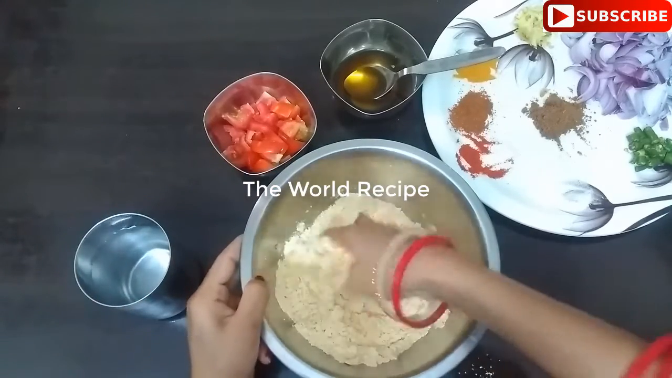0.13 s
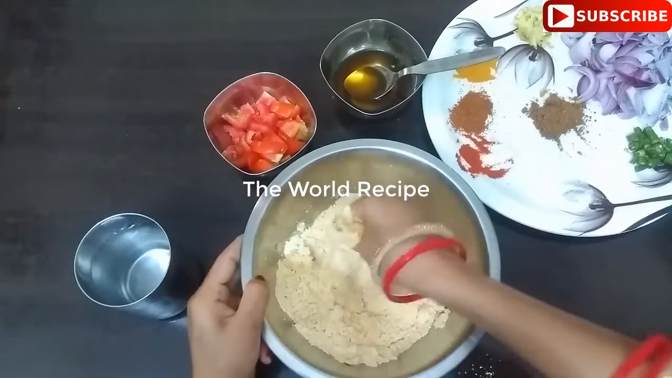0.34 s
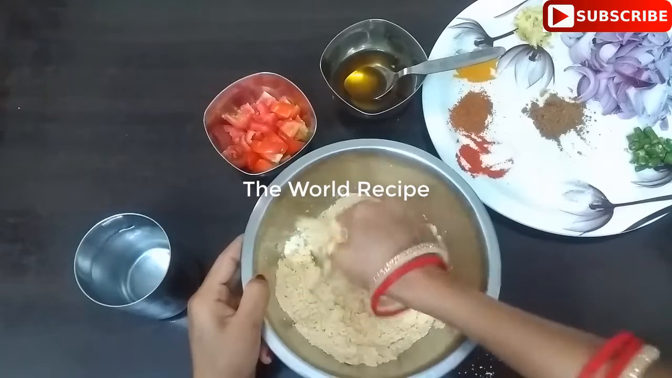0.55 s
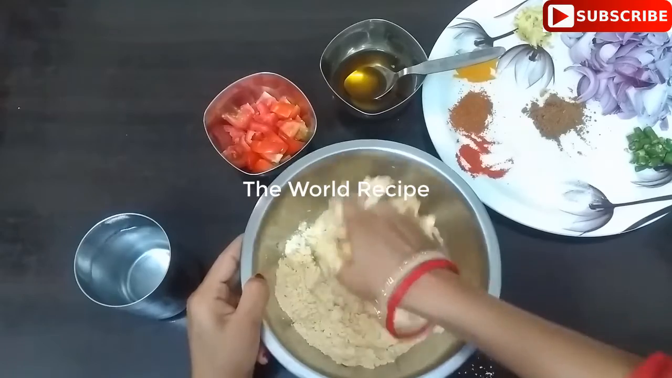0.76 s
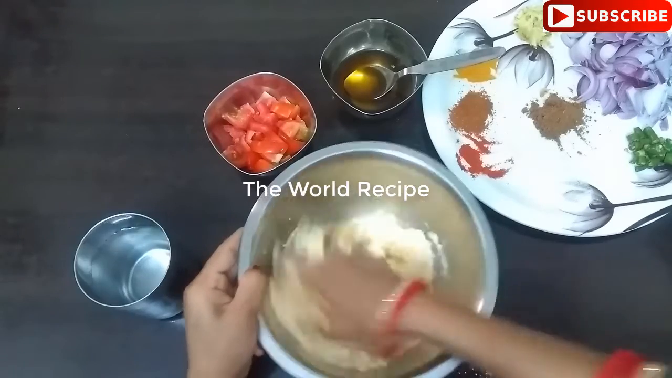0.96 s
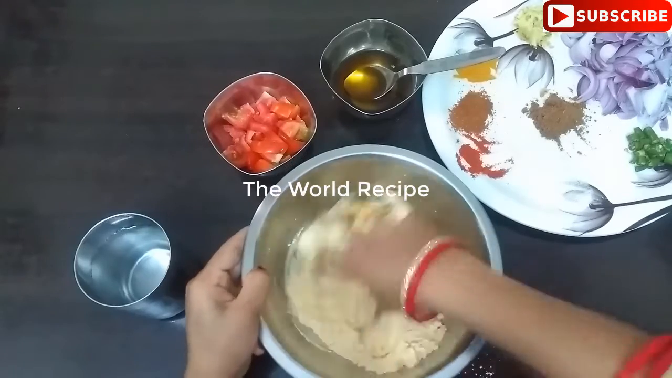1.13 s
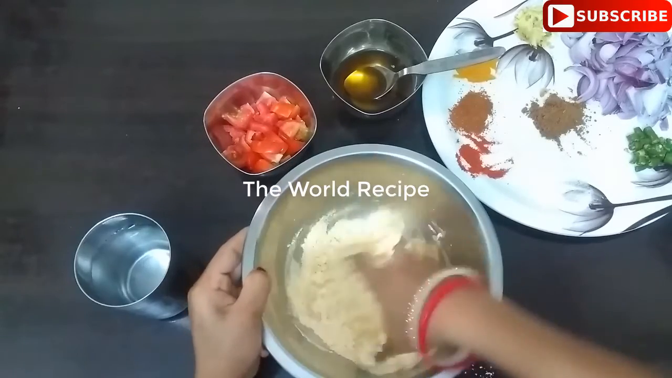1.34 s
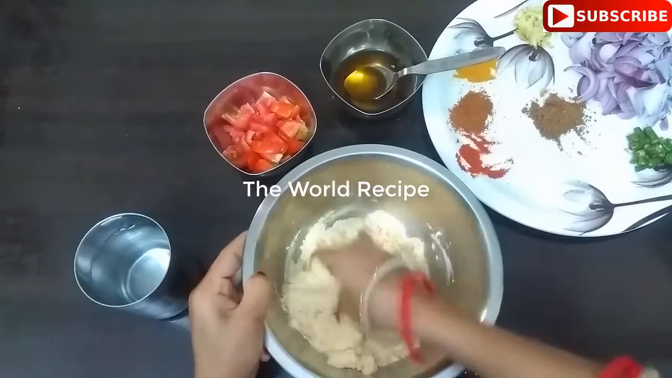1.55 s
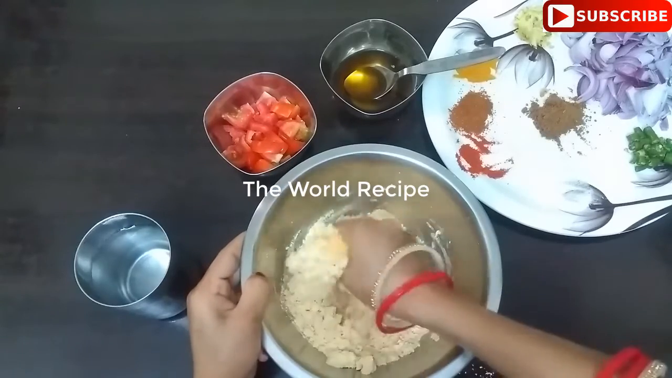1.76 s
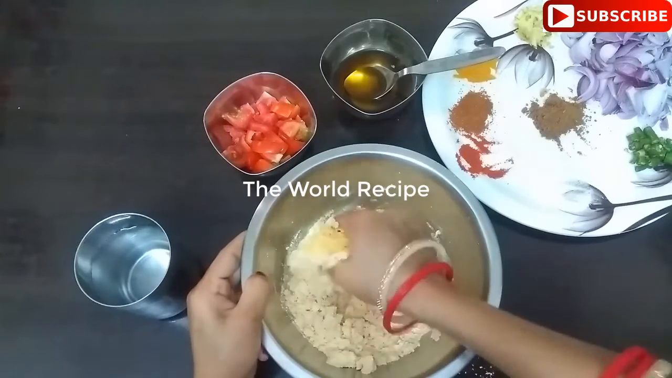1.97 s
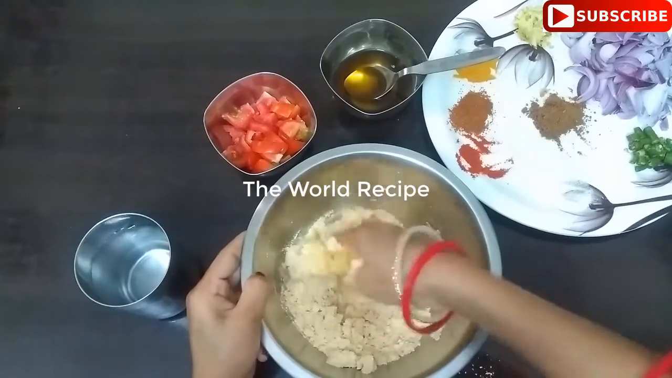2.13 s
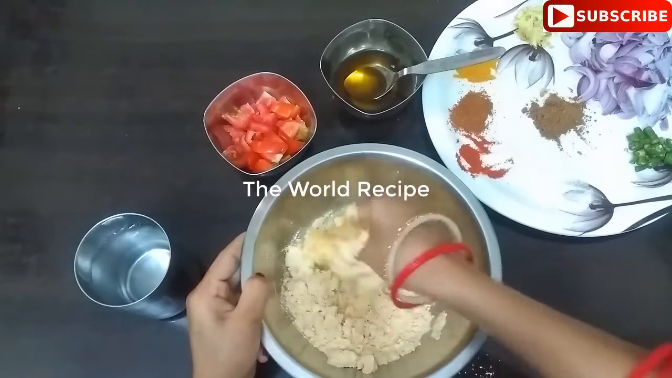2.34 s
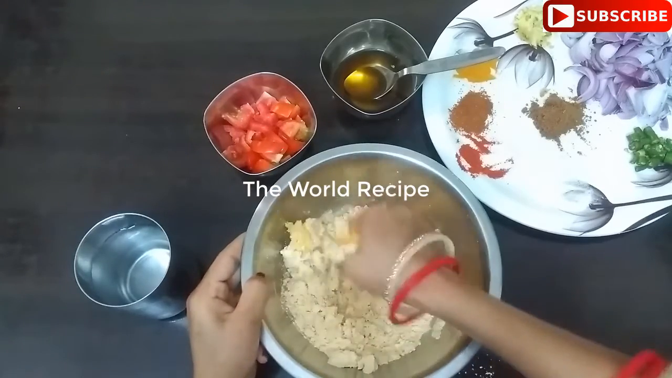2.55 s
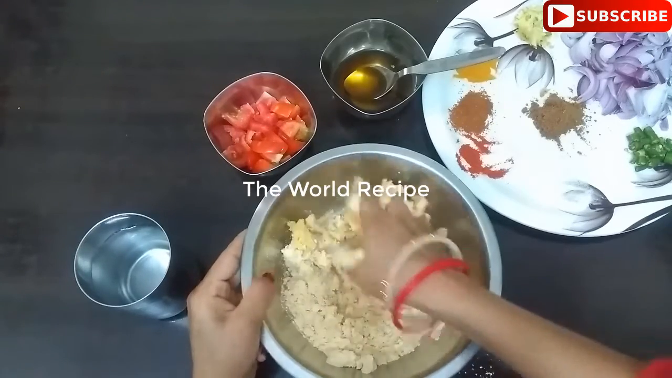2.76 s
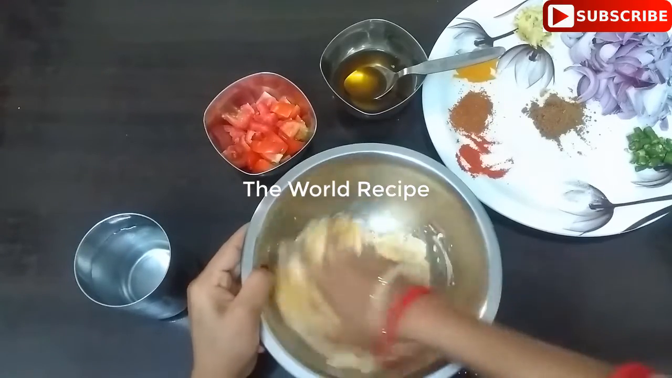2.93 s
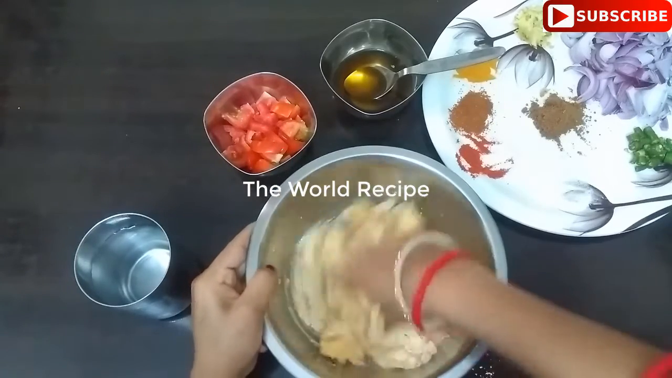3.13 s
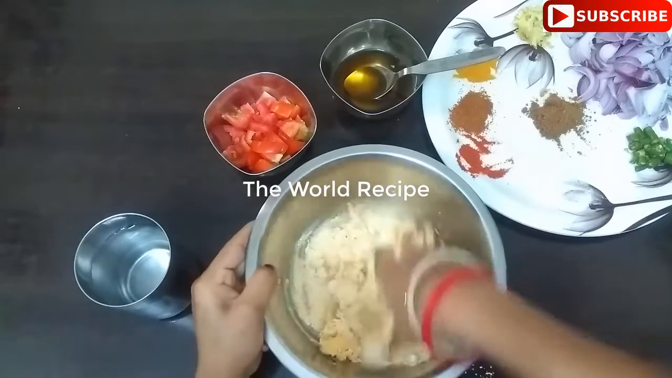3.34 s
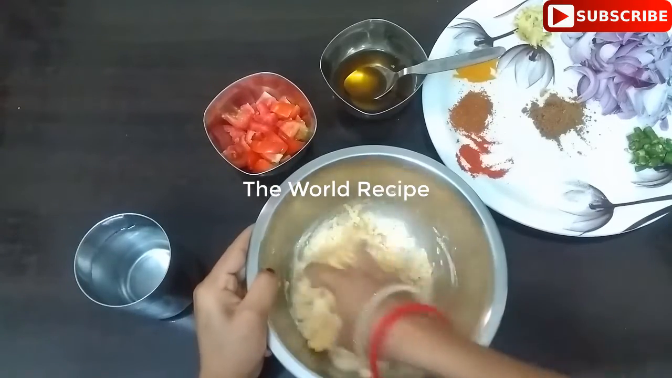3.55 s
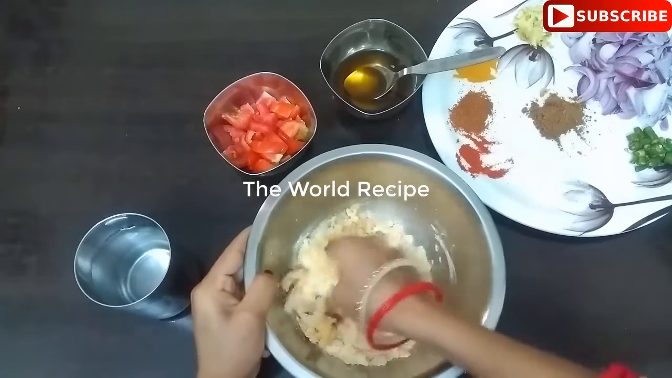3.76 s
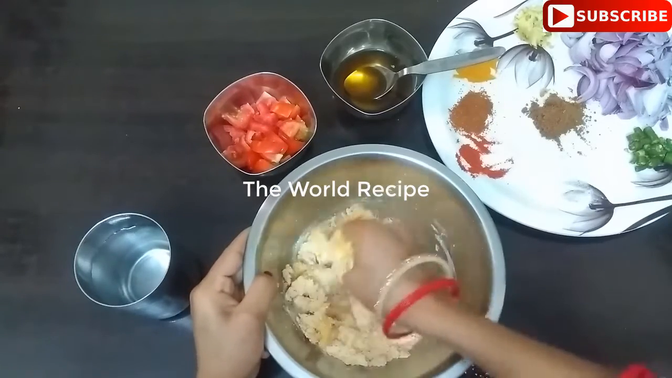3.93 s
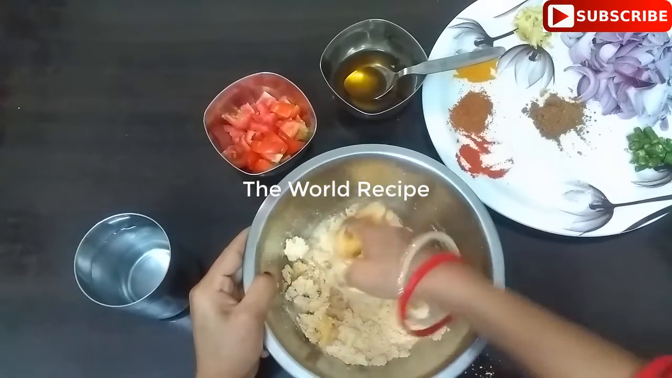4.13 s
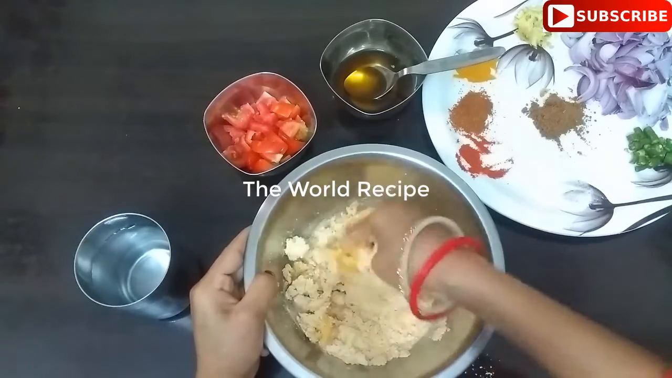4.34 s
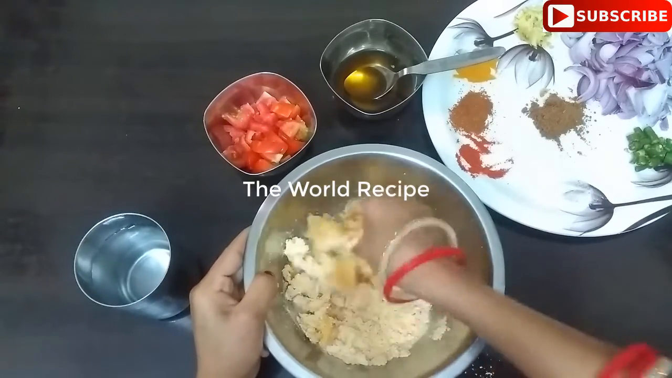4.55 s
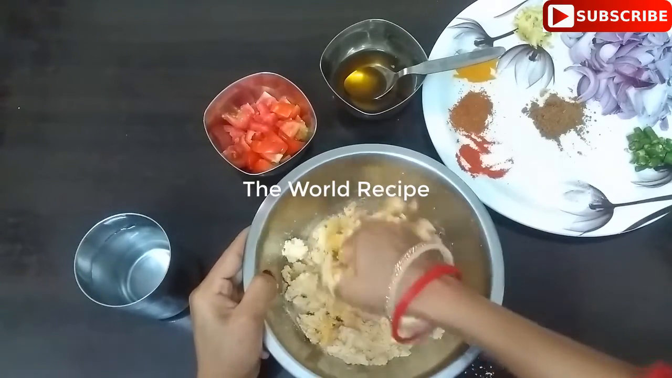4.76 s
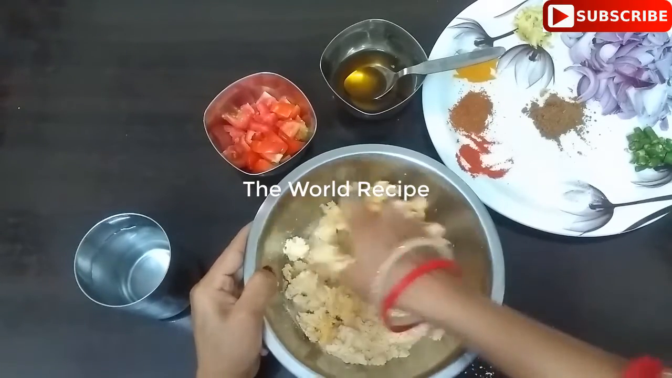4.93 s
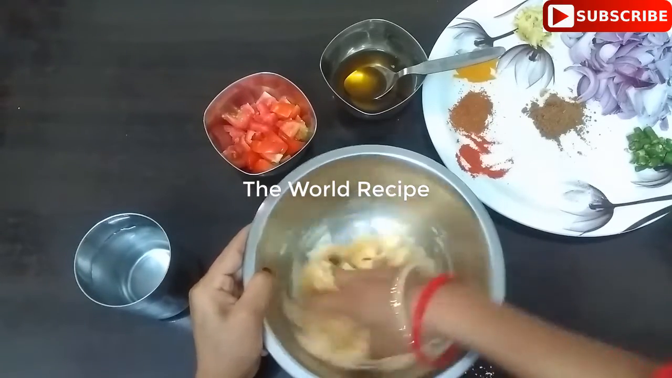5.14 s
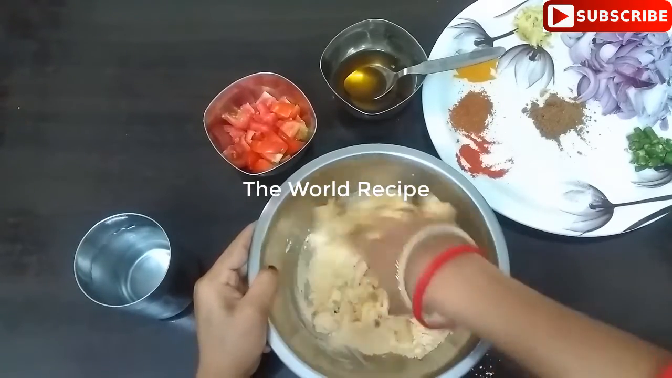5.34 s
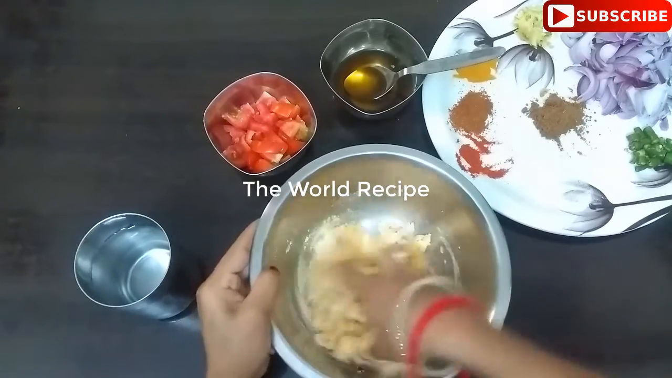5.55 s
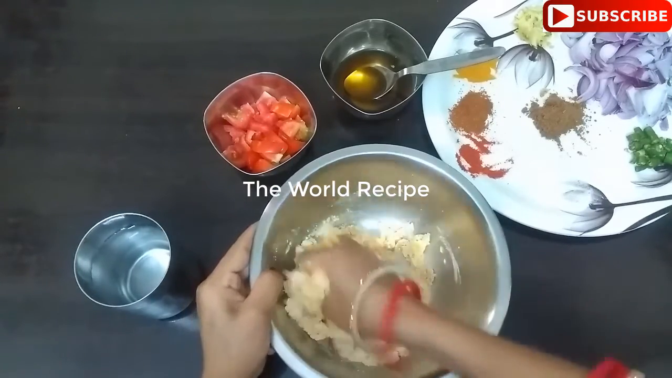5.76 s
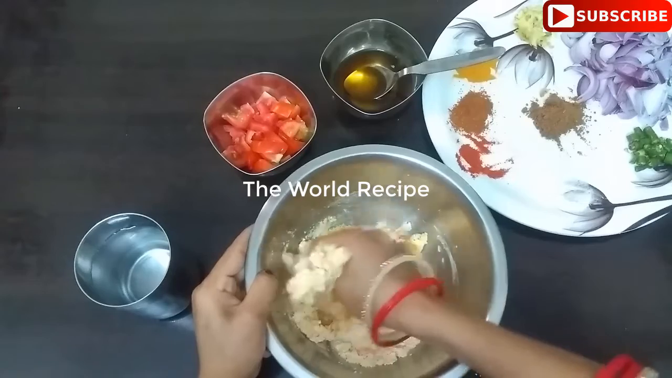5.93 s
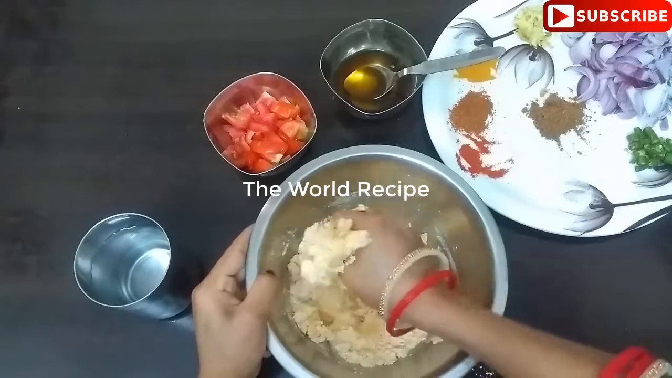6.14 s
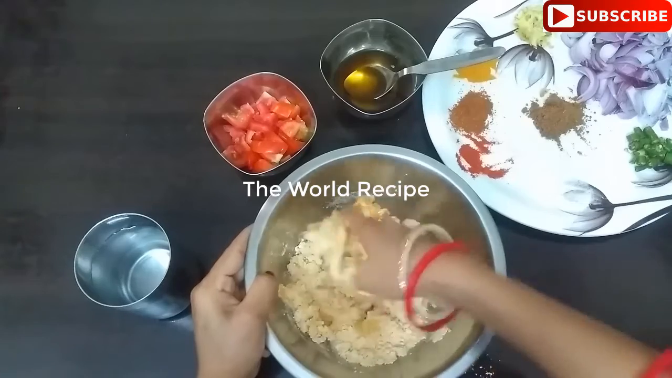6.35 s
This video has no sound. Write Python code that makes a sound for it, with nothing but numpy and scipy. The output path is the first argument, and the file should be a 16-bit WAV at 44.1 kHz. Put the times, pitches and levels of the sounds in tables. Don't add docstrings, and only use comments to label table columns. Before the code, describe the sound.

Gritty scraping and soft thuds of dough being worked in a metal bowl, bangles knocking the steel wall over a faint household hum.

```python
import sys
import numpy as np
from scipy import signal
from scipy.fft import rfft, irfft, dct, next_fast_len
from scipy.io import wavfile
from scipy.ndimage import uniform_filter1d

SR = 44100
rng = np.random.default_rng(int(sys.argv[2]) if len(sys.argv) > 2 else 0)


def voltage_ratio(decibels):
    exponent = np.asarray(decibels, float) / 20
    return 10 ** exponent


def transcribe(u):
    v = np.clip(np.atleast_2d(u).T, -1, 1)
    q = np.round(v * 32767).astype(np.int16)
    wavfile.write(sys.argv[1], SR, q)


N = 286194

# start_s, wall_db, wall_hz, upper_wall_db, rim_db
KNOCKS = [(1.258, -14, 1323, -14.5, -11.5), (1.2731, -25, 1370, -21, -12), (1.286, -19, 1415, -23, -14.5),
          (1.3579, -14.5, 1560, -23.5, -44), (1.386, -23, 1620, -56, -36), (1.4556, -21.5, 1107, -34, -47),
          (2.551, -33, 1400, -46, -38), (2.868, -29, 1610, -36.5, -25), (2.9348, -23, 1490, -33, -34),
          (3.38, -21.5, 1016, -29, -26), (3.3879, -10, 1544, -27, -33), (5.0875, -22, 1550, -30, -22),
          (5.104, -26, 1220, -31, -38), (5.374, -36, 1560, -36.5, -44), (5.465, -1, 1526, -11, -9.5),
          (5.4795, -35, 1600, -22, -18), (5.485, -16.5, 1634, -16.5, -5.5)]
# start_s, click_db, thud_db, flour_db, edge_db
TICKS = [(0.0225, -45, -49, -55, -56), (0.443, -39.5, -56, -40, -56), (0.7487, -31.5, -40.5, -34, -48),
         (0.9614, -34, -28.5, -46, -37), (1.0104, -32, -37.5, -33, -28), (1.0346, -48, -38, -45, -38),
         (1.4532, -25.5, -31.5, -55, -42), (1.6387, -19, -20.5, -20.5, -20), (1.932, -35, -52, -68, -53),
         (2.549, -40, -38, -52, -49), (2.6308, -34.5, -54, -34.5, -34), (2.968, -38, -32, -47, -33),
         (3.5906, -25, -37, -21, -31), (3.5925, -30, -46, -50, -21), (3.6207, -39, -43, -33, -45),
         (4.0465, -26.5, -59, -37, -43), (4.1931, -30, -47, -41, -54), (4.197, -37, -53, -38.5, -31),
         (4.42, -55.5, -54, -56, -55), (4.8052, -35, -63, -42, -42), (4.8941, -28, -55, -40, -34),
         (5.118, -57, -31.5, -60, -56), (5.698, -25.5, -50, -33, -26), (5.714, -44, -55, -37, -26.5),
         (5.7484, -35.5, -50, -33, -34), (5.7561, -49, -55, -45, -31), (5.85, -44, -41, -59, -45),
         (5.97, -51, -51, -49, -62), (5.977, -36, -43, -45, -40), (6.1875, -54, -56, -50, -60)]
# mode_hz, level_db, t60_s
COUNTER_MODES = [(198, -4, 0.3), (372.3, 4.5, 0.056), (410, -11, 0.13)]
# mode_hz, level_db, t60_s
UPPER_MODES = [(904, 0, 0.026), (2190, 6, 0.12), (2786, 4, 0.081), (2999, 6, 0.082), (3346, 2, 0.086),
               (3830, -7.5, 0.12), (5130, -10, 0.054), (5700, -16, 0.028)]
# freq_hz, level_db (per Hz)
HISS_COLOUR = [(5000, -30.5), (7000, -1.5), (8500, -11.5), (9000, 5.5), (9500, 1.5), (10500, -0.5),
               (11700, 4.5), (13000, -4.5)]


def evened(x):
    return x / np.sqrt(np.mean(x ** 2) + 1e-20)


def read(points, hz):
    f, value = np.transpose(points)
    return np.interp(np.log(hz + 1), np.log(f + 1), value)


def add(mix, s, sound):
    part = mix[..., round(s * SR):][..., :sound.shape[-1]]
    part += sound[..., :part.shape[-1]]


def banded(x, low_hz, high_hz):
    b, a = signal.butter(2, [low_hz, high_hz], "band", fs=SR)
    return evened(signal.lfilter(b, a, x))


def bumps(peaks, hz):
    return np.sqrt(1 + sum(voltage_ratio(db) ** 2 / (1 + (2 * (hz - f) / width) ** 2) for f, width, db in peaks))


def noise(gain, patchy_db):
    frames, hz = N // 256 + 5, np.fft.rfftfreq(1024, 1 / SR)
    a, b, c, d, patches = rng.standard_normal((frames, 513, 5)).T
    patches = uniform_filter1d(patches, size=14, axis=0)
    patches = evened(uniform_filter1d(patches, size=8, axis=1))
    z = np.array([a + 1j * b, c + 1j * d]) * gain(hz)[:, None] * voltage_ratio(patchy_db * patches)
    return evened(signal.istft(z, nperseg=1024, noverlap=768)[1][:, :N])


def grit(per_s, spread_db, ms):
    size = voltage_ratio(spread_db * np.minimum(rng.exponential(1, N), 5))
    size = size * (rng.random(N) < per_s / SR)
    keep = np.exp(-1000 / (ms * SR))
    return evened(np.sqrt(signal.lfilter([1], [1, -keep], size ** 2) + 1e-9))


def waver(hz, width, t):
    slow = signal.lfilter([1], [1, -np.exp(-np.pi * width / SR)], rng.standard_normal((2, 2, len(t))))
    slow = evened(slow) + 3 / width * np.array([[1, 0], [0, 1]])[..., None]
    return evened(slow[0] * np.cos(2 * np.pi * hz * t) + slow[1] * np.sin(2 * np.pi * hz * t))


def room_air():
    # freq_hz, level_db (per Hz)
    air_colour = [(40, -41), (70, -7), (130, 7.5), (220, -1.5), (400, -15.5), (800, -12.5), (1500, -21.5),
                  (2500, -15), (4000, -31), (6000, -27.5), (8000, -34), (10500, -38), (12800, -28)]
    return voltage_ratio(-45.5) * noise(lambda hz: voltage_ratio(read(air_colour, hz)), 2.2)


def far_tones():
    # tone_hz, width_hz, level_db
    machines = [(53.2, 17, -50), (116, 7.1, -75), (132.2, 8.1, -56.5), (177.6, 3, -53), (215.1, 1.7, -49),
                (360.8, 7.4, -57), (498.5, 8.8, -58), (953, 14, -68)]
    # start_s, length_s, tone_hz, width_hz, level_db
    outside = [
        (5.84, 0.092, 633, 3, -48.5),
        (5.92, 0.17, 624, 5.2, -49),
        (6.19, 0.11, 900, 4, -54),
        (6.32, 0.18, 635, 3.3, -54),
        (6.192, 0.052, 2940, 200, -50.5),
    ]
    out = sum(voltage_ratio(db) * waver(hz, width, np.arange(N) / SR) for hz, width, db in machines)
    t = np.arange(0, .2, 1 / SR)
    for s, length, hz, width, db in outside:
        swell = np.sin(np.pi * np.minimum(t / length, 1))
        add(out, s, voltage_ratio(db) * waver(hz, width, t) * swell)
    return out


def kitchen(x):
    # freq_hz, t60_s
    decay = [(200, 0.32), (1500, 0.32), (4000, 0.43), (9000, 0.11), (13000, 0.024)]
    taps = np.zeros((2, SR // 2))
    at = np.arange(120, SR // 2 - 20, 20) + rng.integers(0, 20, (2, (SR // 2 - 121) // 20))
    np.put_along_axis(taps, at, rng.choice([-1., 1.], at.shape), 1)
    hz, t, z = signal.stft(taps, SR, nperseg=256)
    tail = signal.istft(z * voltage_ratio(-60 * t / read(decay, hz)[:, None]), SR, nperseg=256)[1]
    return signal.fftconvolve(x[None], tail / np.linalg.norm(tail[0]), axes=1)[:, :N]


def ring(modes, luck, t):
    tones = 0
    for k, (hz, db, t60) in enumerate(modes):
        level = voltage_ratio(db + 2.2 * luck[k] - 60 * t / t60)
        tones = tones + level * np.sin(2 * np.pi * hz * (1 + 0.0112 * luck[k + 8]) * t)
    return tones / abs(tones).max()


def ticks():
    thud_counter_db, slide_t60_s, slide_rise_s = 8, 0.23, 0.0096
    clicks, flour, t = np.zeros(N), np.zeros(N), np.arange(12000) / SR
    for (s, click_db, thud_db, flour_db, edge_db), luck in zip(TICKS, rng.standard_normal((40, 16))):
        snap = rng.standard_normal(len(t)) + 4 * (t == 0)
        click = voltage_ratio(click_db + 1 - 60 * t / .009) * banded(snap, 2500, 8500)
        click += voltage_ratio(edge_db + 2 - 60 * t / .012) * banded(snap, 8500, 16000)
        click += voltage_ratio(thud_db + 1 - 60 * t / 0.04) * banded(snap, 420, 1800)
        click += voltage_ratio(thud_db + thud_counter_db) * ring(COUNTER_MODES, luck, t)
        add(clicks, s + .0007, click)
        add(flour, s, voltage_ratio(flour_db - 60 * t / slide_t60_s) * np.minimum(t / slide_rise_s, 1) ** 2)
    hiss = noise(lambda hz: voltage_ratio(.8 * read(HISS_COLOUR, hz)), 2.2) * grit(2500, 1.7, 1.5)
    return clicks, flour * hiss


def knocks():
    # mode_hz, level_db, t60_s
    rim_modes = [(8210, 2, 0.074), (8040, 2.5, 0.082), (8400, -5, 0.089), (8440, -4, 0.12), (8470, 0, 0.08),
                 (11300, -10, .05), (11100, -4, 0.11)]
    wall_t60_s, wall_rise_s = 0.041, 0.0023
    jolt_share, jolt_db = 0.61, -15
    out, t = np.zeros(N), np.arange(8000) / SR
    for (s, wall_db, wall_hz, upper_db, rim_db), luck in zip(KNOCKS, rng.standard_normal((40, 16))):
        wall = [(wall_hz, 0, wall_t60_s), (wall_hz * 1.045, -12, wall_t60_s)]
        snap, fade = rng.standard_normal(len(t)), voltage_ratio(-60 * t / .016)
        upper = ring(UPPER_MODES, luck[::-1], t) + voltage_ratio(-1) * fade * banded(snap, 2000, 7000)
        rim = ring(rim_modes, -luck, t) + voltage_ratio(-9) * fade * banded(snap, 7000, 14000)
        sound = voltage_ratio(jolt_db + jolt_share * (wall_db + upper_db) / 2) * ring(COUNTER_MODES, luck, t)
        sound += voltage_ratio(upper_db - 2) * upper + voltage_ratio(rim_db + 1) * rim
        add(out, s - .003, sound)
        add(out, s - .002, voltage_ratio(wall_db - 2) * ring(wall, luck, t) * np.minimum(t / wall_rise_s, 1))
    return out


def far_port(x):
    # freq_hz, level_db
    far_level = [(400, -14.5), (1500, -1.5), (3300, -11.5), (5700, -11), (8000, -14), (12000, 0)]
    # freq_hz, lag_rad
    far_lag = [(400, 3.5), (1500, 1.46), (3300, 0.3), (5700, -0.8), (8000, -2), (12000, -1.5)]
    size = next_fast_len(N + 4096)
    hz = np.fft.rfftfreq(size, 1 / SR)
    path = voltage_ratio(read(far_level, hz)) * np.exp(-1j * read(far_lag, hz))
    return irfft(rfft(x, size) * path, size)[:N]


def together(*levels_db):
    return 10 * np.log10(sum(voltage_ratio(2 * np.clip(v, -150, 0)) for v in levels_db))


def after(t, s, db, rise_s, t60):
    late = np.clip(t - s, 1e-12, None)
    return db - 60 * late / t60 + 20 * np.log10(np.minimum(late / rise_s, 1))


def hand():
    # fastest_s, rise_s, fall_s, flour_db, finger_db
    sweeps = [(0.07, 0.058, 0.065, -49, -55.5), (0.78, 0.049, 0.076, -41.5, -55),
              (0.92, 0.14, 0.096, -34, -43.5), (1.03, 0.46, 0.092, -55, -41.5),
              (1.2, 0.3, 0.26, -37.5, -46.5), (1.32, 0.055, 0.22, -33.5, -39), (1.5, .08, 0.13, -46, -44),
              (1.74, 0.36, 0.16, -50, -46), (2.121, 0.31, 0.088, -49, -49),
              (2.56, 0.034, 0.052, -45.5, -53), (2.8, 0.11, 0.076, -37, -43.5),
              (2.91, 0.17, 0.23, -31.5, -38.5), (3.11, 0.043, 0.34, -33.5, -53),
              (3.22, 0.13, 0.092, -36.5, -40.5), (3.41, 0.22, 0.37, -39.5, -39.5),
              (4.07, 0.17, 0.08, -53, -57), (4.87, 0.13, 0.054, -69, -56), (4.93, 0.041, 0.54, -29, -41),
              (5.04, 0.24, 0.84, -39, -40.5), (5.33, 0.081, 0.11, -29.5, -56),
              (5.386, 0.032, 0.046, -50, -33), (5.49, 0.16, 0.12, -32, -33.5),
              (5.768, 0.052, 0.057, -50, -63), (6.31, 0.11, 0.092, -48.5, -51.5),
              (6.48, 0.043, 0.019, -53, -66)]
    # time_s, level_db
    weight = [(0, -45.5), (.2, -50.5), (.45, -50.5), (.7, -66), (.85, -53), (1.5, -44.5), (2.1, -45.5),
              (2.45, -44.5), (2.56, -43.5), (2.66, -47), (3.1, -45.5), (3.6, -42), (3.95, -40.5),
              (4.75, -45.5), (4.92, -48), (5.7, -47.5), (6.05, -47), (6.35, -43)]
    sweep_drop_db, sweep_round = 12, 1.5
    hiss_rest_db, rub_rest_db = -61, -60.5
    lean_rub_db, lean_ring_db = -16, -10
    finger_ring_db, finger_push_db = -6, -2.5
    chatter_share, chatter_db, chatter_rise_s, chatter_t60_s = 0.53, -24, 0.0028, 0.45
    drag_db, drag_rise_s, drag_t60_s = -12, 0.0061, 0.2
    t = np.arange(0, N / SR, .002)
    drops = []
    for s, rise, fall, *_ in sweeps:
        away = np.where(t < s, (s - t) / rise, (t - s) / fall).clip(0)
        drops.append(sweep_drop_db * away ** sweep_round)
    flour = together(*(row[3] - drop for row, drop in zip(sweeps, drops)))
    finger = together(*(row[4] - drop for row, drop in zip(sweeps, drops)))
    lean = np.interp(t, *np.transpose(weight))
    chatter = together(*(after(t, s, chatter_share * db + chatter_db, chatter_rise_s, chatter_t60_s)
                         for s, db, *_ in KNOCKS))
    drag = together(*(after(t, s, db + drag_db, drag_rise_s, drag_t60_s) for s, db, *_ in TICKS))
    hiss = together(flour, hiss_rest_db)
    rub = together(finger, drag, lean + lean_rub_db, rub_rest_db)
    wall_ring = together(finger + finger_ring_db, chatter, lean + lean_ring_db)
    push = together(lean, finger + finger_push_db)
    return [np.interp(np.arange(N) / SR, t, v) for v in (hiss, rub, wall_ring, push)]


def strokes():
    # freq_hz, level_db (per Hz)
    rub_colour = [(400, -6), (900, 5), (2000, 1), (3200, 0.5), (4500, 5), (6500, -1.5), (8500, 0.5),
                  (11000, 0)]
    # freq_hz, level_db (per Hz)
    push_colour = [(30, -33), (45, -22), (60, 3.5), (90, 3), (180, -7), (280, -15), (600, -17),
                   (1000, -30.5)]
    wall_hz, wall_half_width_hz = 1542, 350
    hiss_db, rub_db, ring_db, push_db = hand()
    walls = [(f, 60, db + 1) for f, db, t60 in UPPER_MODES]
    thuds = [(f, 40, db) for f, db, t60 in COUNTER_MODES]
    hiss = noise(lambda hz: voltage_ratio(read(HISS_COLOUR, hz)), 3.4) * grit(2000, 2.2, 2.5)
    rub = noise(lambda hz: voltage_ratio(read(rub_colour, hz)) * bumps(walls, hz), 3.0) * grit(1300, 2.5, 2.5)
    wall_ring = noise(lambda hz: 1 / (1 + ((hz - wall_hz) / wall_half_width_hz) ** 2), 1.8)
    wall_ring = wall_ring * grit(300, 2.5, 6.0)
    push = noise(lambda hz: voltage_ratio(read(push_colour, hz)) * bumps(thuds, hz), 0.92)
    out = voltage_ratio(hiss_db + 2.5) * hiss + voltage_ratio(rub_db + 4) * rub
    return out + voltage_ratio(ring_db - 6) * wall_ring + voltage_ratio(push_db + 4.5) * push


def scene():
    blows, (clicks, flour) = knocks(), ticks()
    direct = voltage_ratio(1) * np.array([blows + clicks, far_port(blows + clicks)])
    echo = kitchen(0.25 * blows + 0.27 * clicks)
    return room_air() + far_tones() + echo + flour + direct + strokes()


def paired(first, second, hz):
    # freq_hz, likeness (0-1)
    likeness = [(30, .997), (60, 0.9), (125, 0.85), (200, 0.68), (350, 0.42), (600, 0.55), (1500, 0.05),
                (3000, .2), (13000, .1)]
    # freq_hz, level_db
    second_level = [(300, -.3), (1500, 2.2), (3000, -.5), (6500, 1), (9000, 4.6), (13000, 5)]
    both, apart = first + second, first - second
    alike = np.clip(read(likeness, hz), -.9, .999)
    both, apart = both * np.sqrt(1 + alike) / 2, apart * np.sqrt(1 - alike) / 2
    tilt = voltage_ratio(read(second_level, hz) / 2)
    return (both + apart) / tilt, (both - apart) * tilt


def aimed(first, second, hz):
    # freq_hz, share (0-1)
    shares = [(100, .93), (1100, .89), (2400, .97), (4600, .58), (5800, .52), (7000, .42), (10000, .24),
              (13000, .2)]
    aim_hz, edge_hz = 2324.4, 13110
    taken = np.clip(read(shares, hz), 0, 1) * np.exp(-2j * np.pi * hz / aim_hz)
    edge = 1 / (1 + (hz / edge_hz) ** 300)
    return np.array([first - taken * second, second - taken * first]) * edge


def hushed(x):
    # end_s, length_s, gain_db
    hushes = [(1.255, 0.0083, 1.5), (1.644, 0.0077, -1.5), (2.634, 0.015, -2), (3.591, 0.0043, -11),
              (4.043, 0.0084, -2), (5.456, .012, 1), (5.701, 0.012, -9), (5.977, 0.017, -7),
              (1.652, 0.006, -6), (3.607, 0.0067, -3.5), (5.711, 0.0066, -12)]
    t = np.arange(N) / SR
    gain_db = sum(db * ((t > s - length) & (t < s - .001)) for s, length, db in hushes)
    treble = signal.sosfiltfilt(signal.butter(2, 3570, "high", fs=SR, output="sos"), x)
    return x - (1 - voltage_ratio(uniform_filter1d(gain_db, size=44))) * treble


def thinned(sides):
    # freq_hz, level_db
    limits = [(1100, -21), (1900, -7), (2700, -7.5), (3500, -8.5), (4600, -4.3), (5400, -8), (6000, -6.5),
              (7000, -7), (9000, -10), (12000, -10.5)]
    drift_db, loud_share = 3.0, .18
    hop, first_frame = 1024, 408
    frames, window = N // hop + 2, np.sin(np.pi * (np.arange(2 * hop) + .5) / (2 * hop))
    pair = np.array([sides[0] + sides[1], sides[0] - sides[1]]) / 2
    pair = np.pad(pair, [(0, 0), (hop - first_frame, 3 * hop)])
    at = np.arange(frames)[:, None] * hop + np.arange(2 * hop)
    a, b, c, d = np.split(pair[:, at] * window, 4, axis=2)
    z = dct(np.concatenate([-c[..., ::-1] - d, a - b[..., ::-1]], axis=2), type=4, norm="ortho")
    starts = np.r_[0:96:8, 96:144:12, 144, 160, 176, 196, 216, 240, 264, 292, 306:hop:16]
    hz = (starts + np.diff(np.r_[starts, hop]) / 2) * SR / (2 * hop)
    power = uniform_filter1d(np.add.reduceat(z ** 2, starts, axis=2), size=2, axis=1)
    drift = uniform_filter1d(rng.standard_normal(power.shape), size=2)
    drift = evened(uniform_filter1d(drift, size=4, axis=1))
    loud_db = 10 * np.log10(power[..., 10:].sum(axis=(0, 2)) + 1e-20)
    starved_db = loud_share * np.clip(loud_db - np.median(loud_db), -8, 10)
    limit_db = read(limits, hz) + drift_db * drift + starved_db[:, None]
    kept = power > (hz > 700) * voltage_ratio(limit_db) ** 2 * power[::-1]
    z = z * kept[..., np.searchsorted(starts, np.arange(hop), "right") - 1]
    u, v = np.split(dct(z, type=4, norm="ortho"), 2, axis=2)
    blocks = np.concatenate([v, -v[..., ::-1], -u[..., ::-1], -u], axis=2) * window
    joined = blocks[:, 1:, :hop] + blocks[:, :-1, hop:]
    joined = np.concatenate([blocks[:, 0, :hop], joined.reshape(2, -1)], axis=1)
    both, apart = joined[:, hop - first_frame:][:, :N]
    return np.array([both + apart, both - apart])


def top_cut(x):
    return signal.sosfilt(signal.butter(12, 14260, fs=SR, output="sos"), x)


def record(dry):
    size = next_fast_len(N + 4096)
    hz = np.fft.rfftfreq(size, 1 / SR)
    first, second = rfft(1.15 * np.tanh(dry / 1.15), size)
    first, second = paired(first, second, hz)
    sides = irfft(aimed(first, second, hz), size)[:, :N]
    mix = thinned(hushed(sides))
    return top_cut(mix)


dry = scene()
out = record(dry)
transcribe(out)
```